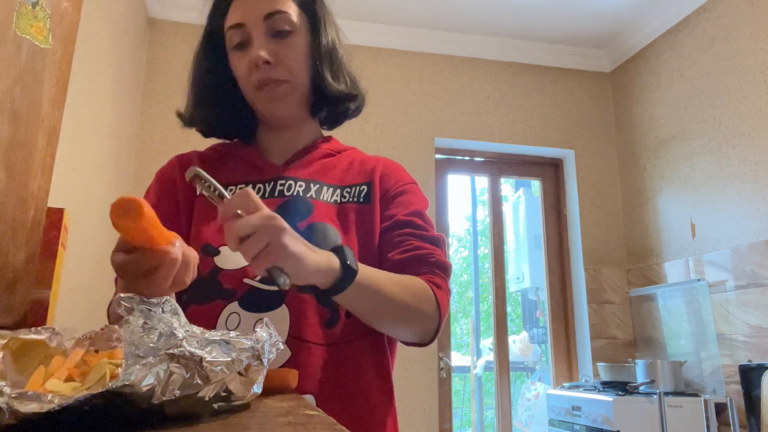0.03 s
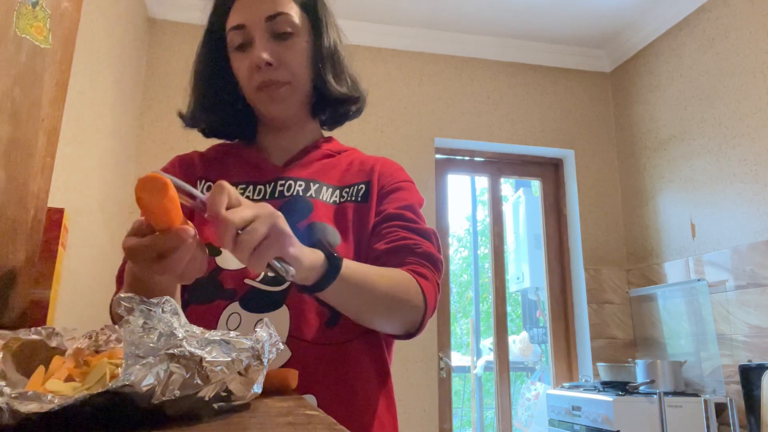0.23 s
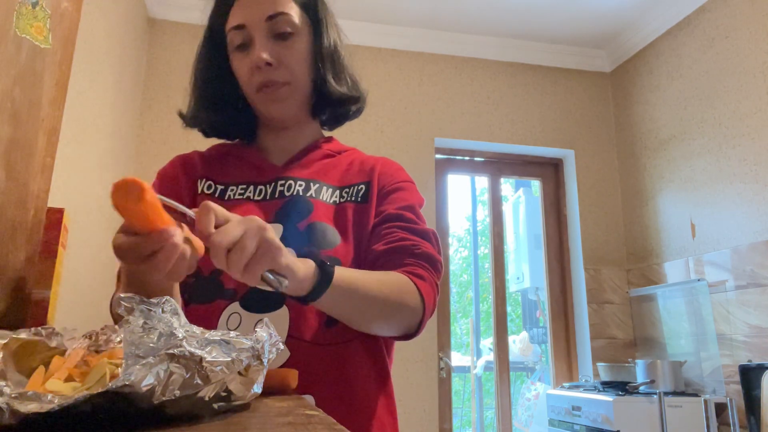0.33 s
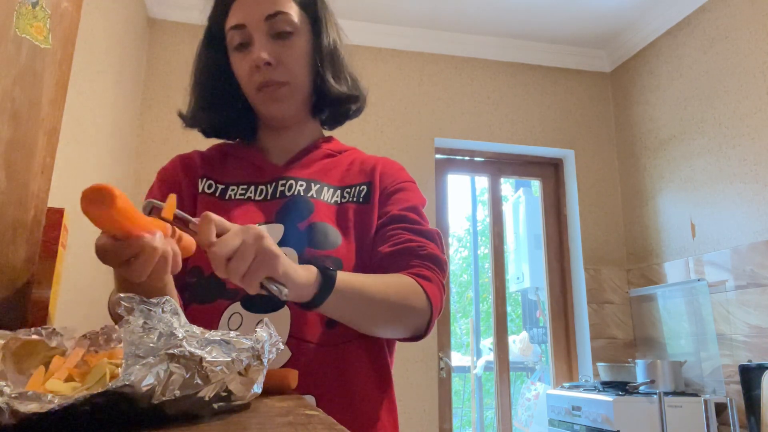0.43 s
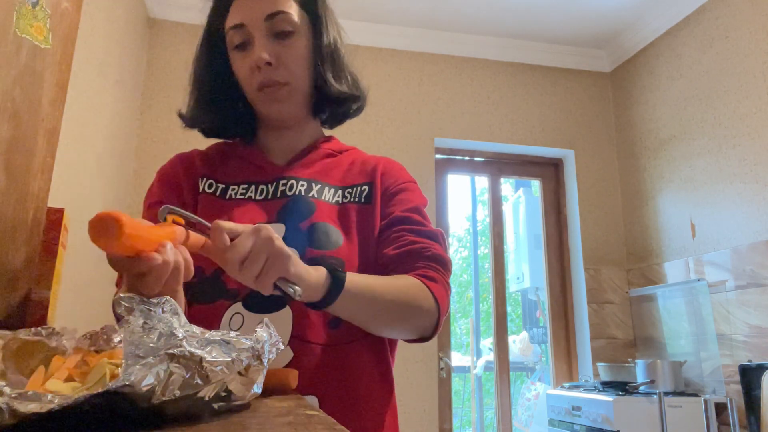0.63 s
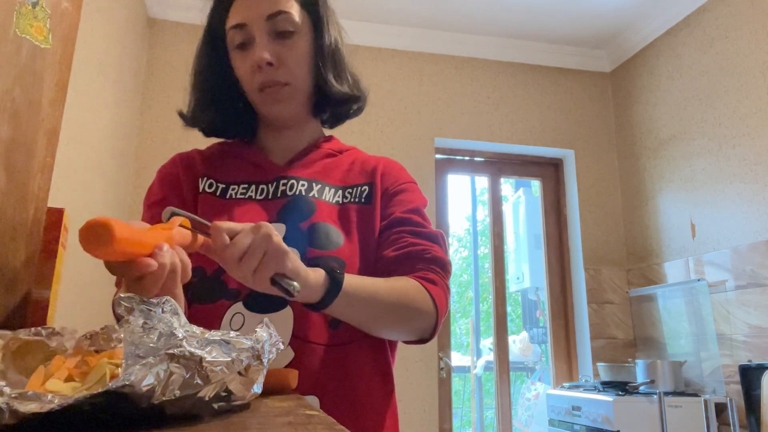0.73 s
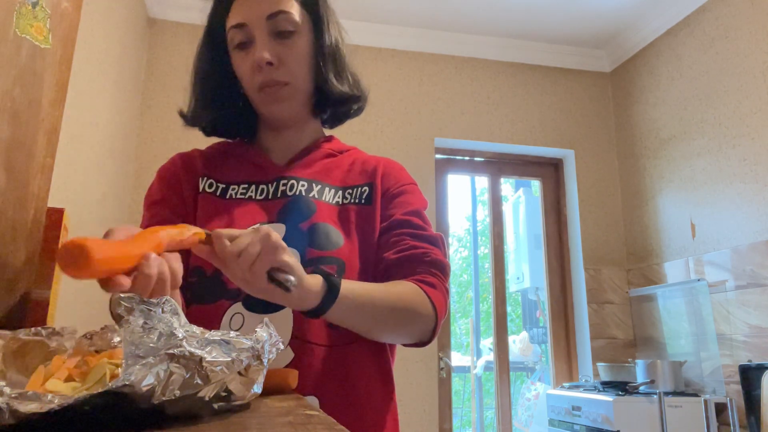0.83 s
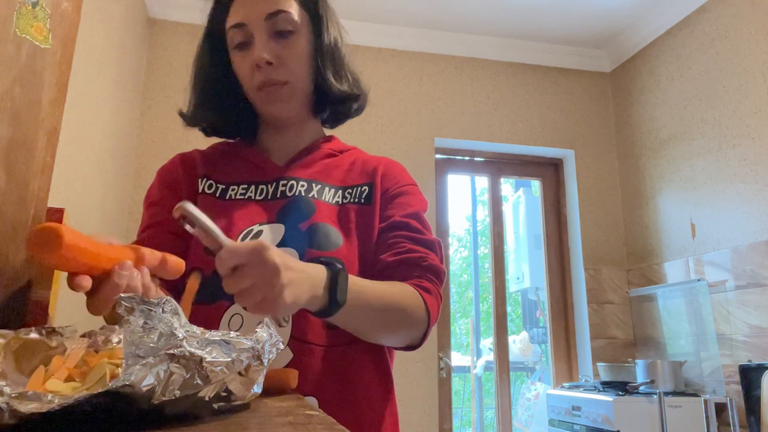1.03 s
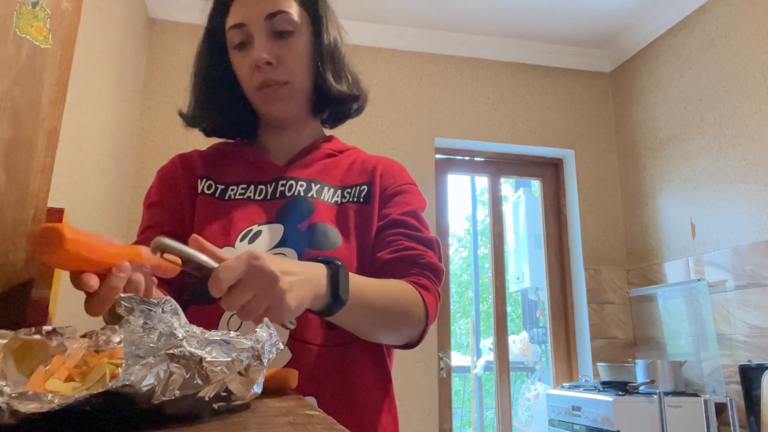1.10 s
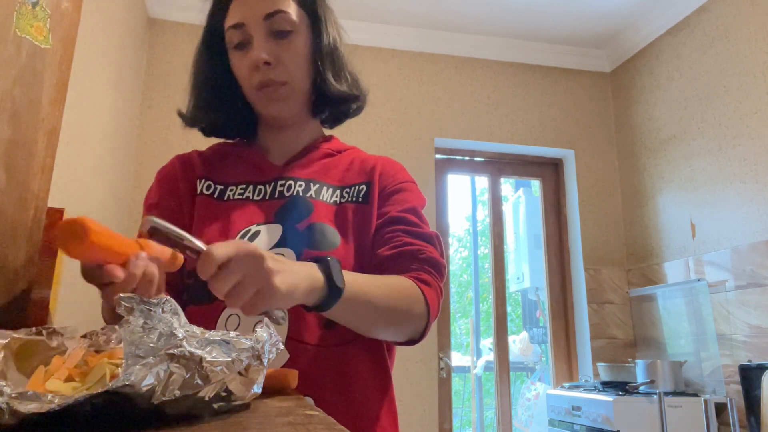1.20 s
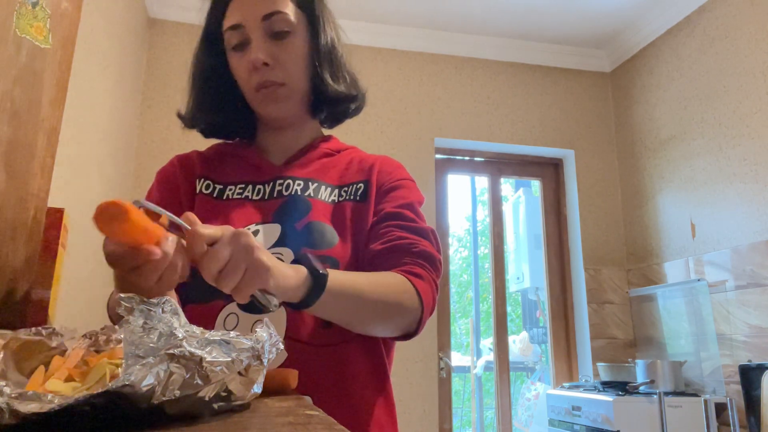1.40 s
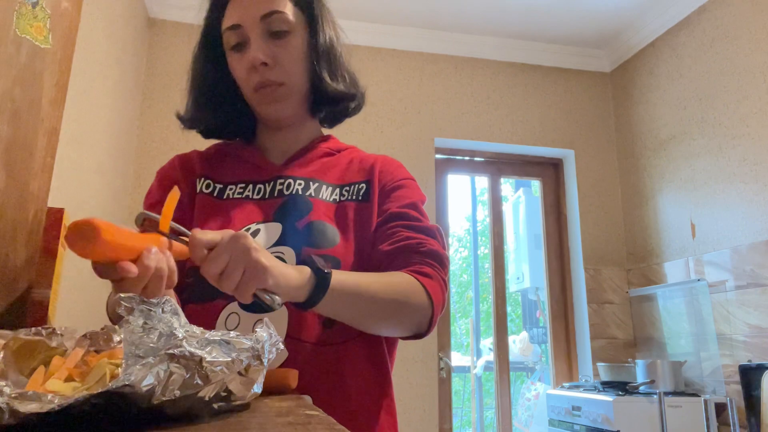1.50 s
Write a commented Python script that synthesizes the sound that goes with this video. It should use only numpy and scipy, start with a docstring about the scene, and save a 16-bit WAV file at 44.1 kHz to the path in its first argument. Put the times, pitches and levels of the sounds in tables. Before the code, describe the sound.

A hand peeler scrapes crisp strips off a raw carrot in short strokes, blade clinking lightly

```python
"""In a small, hard-walled kitchen, a swivel peeler takes strips off a raw carrot.
The loose blade chinks in its holder as ringing steel modes, then bites with a short push on the holder.
Each stroke is a dense crackle of random cell bursts, with the blade's ring, a fizz and noise-burst snaps.
A strip drops with hollow thuds of decaying modes on a foil-lined tray; filtered noise hums quietly."""
import sys
import numpy as np
from scipy import signal
from scipy.fft import rfft, irfft
from scipy.io import wavfile
from scipy.ndimage import uniform_filter1d

SR = 44100
rng = np.random.default_rng(int(sys.argv[2]) if len(sys.argv) > 2 else 0)


def persist_wave(psi):
    """Save psi, clipped to +-1, as 16-bit WAV."""
    counts = np.round(np.clip(psi, -1, 1) * 32767).astype(np.int16)
    wavfile.write(sys.argv[1], SR, np.atleast_2d(counts).T)


N = 68355
T = np.arange(N) / SR
PEELER_LAG_S = 20 / SR
TRAY_PAN_DB = 3.5  # left over right


def undb(db):
    """Decibels to gain."""
    return 10 ** (np.asarray(db) / 20)


def unit(x):
    """Scale to rms 1."""
    return x / np.sqrt(np.mean(x ** 2))


def noise():
    """White noise."""
    return rng.standard_normal(N)


def colour(x, points):
    """Minimum-phase filter through (Hz, dB) points, its impulse response scaled to unit energy."""
    hz, db = np.array(points).T
    log_bins = np.log(np.fft.rfftfreq(4096, 1 / SR) + 1)
    log_gain = np.log(undb(np.interp(log_bins, np.log(hz), db)))
    # folding the cepstrum forward in time makes the filter causal
    cepstrum = irfft(log_gain)
    half = len(cepstrum) // 2
    folded = np.r_[cepstrum[0], 2 * cepstrum[1:half], np.zeros(half)]
    impulse = irfft(np.exp(rfft(folded)))
    return signal.fftconvolve(x, impulse / np.linalg.norm(impulse))[:N]


def band(x, hz, width_hz):
    """One resonance."""
    return signal.lfilter(*signal.iirpeak(hz, hz / width_hz, fs=SR), x)


def fall(start, decay):
    """Exponential decay from a moment on, both in seconds."""
    return (T >= start) * np.exp(-np.maximum(T - start, 0) / decay)


def ring(modes, start, push, jitter=0.):
    """Decaying modes, eased in over a push of some length; jitter detunes each by a random ratio."""
    t = np.maximum(T - start, 0)
    rise = np.sin(np.pi / 2 * np.minimum(t / push, 1)) ** 2
    total = 0
    for hz, db, t60 in modes:
        detune = 1 + jitter * rng.standard_normal()
        total = total + undb(db - 60 * t / t60) * np.sin(2 * np.pi * hz * detune * t)
    return rise * total


def place(x, lag, pan_db):
    """Stereo position: the left channel comes later by the lag, and louder than the right by pan_db."""
    left = np.interp(T - lag, T, x, left=0)
    return np.array([left * undb(pan_db / 2), x * undb(-pan_db / 2)])


def cell_bursts(rate, judder):
    """Clicks of random sign and strength at random moments, so many a second: cells bursting one by one."""
    spread_db = 5
    hits = rng.random(N) < rate / SR
    return judder * hits * np.sign(noise()) * undb(spread_db * noise())


def cutting():
    """Cells burst under the blade: a broad crackle, a low crunch, the scraped blade's ring and a wet fizz."""
    # Each row: start and end in seconds, flesh in dB, blade ring in dB, ring pitch in Hz,
    # fizz in dB, low crunch in dB.
    strokes = [(0.277, 0.34, -53.5, -57.5, 4280, -60, -72), (0.337, 0.418, -51, -51.5, 4340, -53, -68.5),
               (0.424, 0.491, -49, -56, 4340, -58.5, -61.5), (0.626, 0.687, -49, -59, 4380, -51, -57.5),
               (0.733, 0.758, -45.5, -51.5, 4100, -45.5, -49.5),
               (0.766, 0.78, -49.5, -62, 4120, -38.5, -67), (1.009, 1.05, -61, -80, 4340, -82, -79.5),
               (1.059, 1.092, -56.5, -65, 4370, -76, -57.5), (1.293, 1.317, -46.5, -51, 4190, -49, -58.5),
               (1.355, 1.421, -52.5, -56.5, 4120, -55, -57), (1.416, 1.451, -50.5, -56.5, 4200, -49, -55.5),
               (1.454, 1.56, -48.5, -57, 4430, -54.5, -57)]
    # Colour of the bursting flesh. Each row: frequency in Hz, level in dB per Hz.
    flesh_colour = [(100, -18), (350, 6.5), (1000, -20), (1650, -10), (2300, 6.5), (2850, -4), (3400, 5.5),
                    (5400, -2), (6900, -0.5), (7900, 1), (9600, 1.5), (10800, 5), (12000, -26), (16000, 4)]
    # Colour of the low crunch. Each row: frequency in Hz, level in dB per Hz.
    crunch_colour = [(150, -21.5), (400, -4), (700, 3), (1000, 5), (1450, -3), (1750, -6), (2700, -16),
                     (3200, 2.5), (3700, -9.5), (6000, -15.5), (16000, -47.5)]
    cells_per_s, crunches_per_s = 7000, 1500
    judder_hz, judder_db = 260, 0.5
    fizz_hz, fizz_width_hz, scrape_width_hz = 15100, 1300, 680
    attack_s, release_s = .004, .005

    # slow random unevenness of the blade's grip
    wobble = unit(uniform_filter1d(noise(), max(int(SR / judder_hz), 1)))
    judder = undb(judder_db * wobble)

    def resonant_crackle(hz, width_hz):
        """Cell bursts through the same resonance twice, for steeper sides."""
        once = band(cell_bursts(cells_per_s, judder), hz, width_hz)
        return unit(band(once, hz, width_hz))

    flesh = unit(colour(cell_bursts(cells_per_s, judder), flesh_colour))
    crunch = unit(colour(cell_bursts(crunches_per_s, judder), crunch_colour))
    fizz = resonant_crackle(fizz_hz, fizz_width_hz)
    out = 0
    for start, end, flesh_db, ring_db, ring_hz, fizz_db, crunch_db in strokes:
        attack = 1 - np.exp(-np.maximum(T - start, 0) / attack_s)
        release = np.exp(-np.maximum(T - end, 0) / release_s)
        steel = resonant_crackle(ring_hz, scrape_width_hz)
        crackle = undb(flesh_db) * flesh + undb(crunch_db) * crunch
        out = out + attack * release * (crackle + undb(ring_db) * steel + undb(fizz_db) * fizz)
    return out


def snaps():
    """Tough fibres give way: a bright noise burst with a lower crack."""
    # Each row: start in seconds, level in dB, decay in seconds, low crack in dB relative to the burst.
    fibres = [(0.2651, -21.5, 0.0025, -21.5), (0.2773, -43, 0.0025, -11), (0.287, -39, .003, -38),
              (0.633, -44.5, 0.01, -5), (.773, -40.5, 0.00084, -25), (0.777, -55, 0.0016, -36.5),
              (0.9539, -45.5, .003, -6.5), (1.027, -47, 0.0035, 2), (1.085, -44.5, 0.0015, -5),
              (1.3125, -29.5, 0.001, -16), (1.381, -45.5, 0.0042, -2), (1.4296, -46.5, 0.0012, 8),
              (1.438, -49, 0.0027, -5)]
    # Colour of the bright burst. Each row: frequency in Hz, level in dB per Hz.
    snap_colour = [(1000, -7.5), (4000, -27), (7000, -4.5), (9000, 1), (10600, 9.5), (12300, -35),
                   (13600, 5.5), (15300, -2.5), (17000, 2)]
    crack_hz, crack_width_hz = 1677, 4500
    bright = colour(noise(), snap_colour)
    crack = unit(band(noise(), crack_hz, crack_width_hz))
    out = 0
    for start, db, decay, crack_db in fibres:
        out = out + undb(db) * fall(start, decay) * (bright + undb(crack_db) * crack)
    return out


def bite():
    """The blade bites in once: a short push sets the holder ringing."""
    # Modes of the holder. Each row: frequency in Hz, level in dB, 60 dB decay in seconds.
    holder = [(4220, 1.5, 0.016), (4370, -23, 0.0058), (3085, -18.5, 0.016), (2015, -32, 0.036)]
    start_s, push_s, level_db = .2664, 0.0012, -9.5
    return undb(level_db) * ring(holder, start_s, push_s)


def chinks():
    """The swivelling blade knocks against its stops: steel modes ring and noise chatters briefly."""
    # Knocks of the loose blade. Each row: start in seconds, level in dB, chatter in dB relative to it.
    knocks = [(0.0468, -66, -11), (0.0656, -42.5, -9.5), (0.1234, -40.5, -19), (0.135, -33, -12.5),
              (0.1562, -24, -26), (.164, -28, -14.5), (0.9862, -59.5, 8), (1.0062, -54, 8.5),
              (1.08, -74, 4), (1.2132, -51.5, -3), (1.295, -45.5, -4.5), (1.3095, -34.5, -19)]
    # Modes of the blade. Each row: frequency in Hz, level in dB, 60 dB decay in seconds.
    blade = [(4184, -6, 0.032), (4416, -17.5, .035), (5600, -16, .04), (7200, -43, 0.042), (9360, -28, .03),
             (13200, -35, 0.23), (15300, -31, .03)]
    # Colour of the chatter. Each row: frequency in Hz, level in dB per Hz.
    chatter_colour = [(1000, -15), (3500, -18), (4250, -12.5), (5000, -12.5), (6300, -24.5), (7300, -1),
                      (8200, -16.5), (9400, -8), (10300, -4.5), (10950, 1), (11900, -20.5), (14200, -12),
                      (15400, -9.5), (17000, -24)]
    edge = (10953, -5.5, .055)  # the thin edge, strongest mode: Hz, dB, 60 dB decay in seconds
    push_s, chatter_s = 0.0014, 0.0093
    chatter = colour(noise(), chatter_colour)
    out = 0
    for start, db, chatter_db in knocks:
        steel = ring([*blade, edge], start, push_s, jitter=0.0023)
        rattle = undb(chatter_db) * chatter * fall(start, chatter_s)
        out = out + undb(db) * (steel + rattle)
    return out


def tray():
    """The strip flops down: hollow modes, mostly sinking as it settles, and a dull rustle of foil."""
    # Landing and settling. Each row: start in seconds, level in dB, pitch ratio.
    thuds = [(1.082, -41.5, 1.1), (1.095, -37.5, 1.08), (1.114, -33, 1.0), (1.16, -41, 0.9),
             (1.197, -42.5, .91), (1.227, -52.5, .91), (1.262, -56, 0.85)]
    # Modes of the tray at ratio 1. Each row: frequency in Hz, level in dB, 60 dB decay in seconds.
    tray_modes = [(109.3, -9.5, 0.21), (151.4, -19, 0.43), (324, 3, .17), (365.6, -10, 0.15),
                  (464, -18, 0.15), (891, -17, 0.2), (1119, -17, 0.097), (1470, -32.5, 0.18)]
    push_s, foil_db, foil_s = 0.0078, -24, 0.01
    foil = undb(foil_db) * unit(band(noise(), 930, 670))
    out = 0
    for start, db, ratio in thuds:
        modes = [(hz * ratio, mode_db, t60) for hz, mode_db, t60 in tray_modes]
        hollow = ring(modes, start, push_s)
        out = out + undb(db) * (hollow + foil * fall(start, foil_s))
    return out


def rubs():
    """Fingers slip a little on the wet carrot between strokes: soft fading bands of noise."""
    # Each row: start in seconds, level in dB, centre in Hz.
    slips = [(.585, -62.5, 1490), (0.972, -71, 820)]
    decay_s, width_hz = 0.07, 460
    out = 0
    for start, db, hz in slips:
        out = out + undb(db) * fall(start, decay_s) * unit(band(noise(), hz, width_hz))
    return out


def nearby(x):
    """Quick scattered echoes from the cupboard and worktop: a short noise burst for each ear."""
    # Colour of the echoes. Each row: frequency in Hz, level in dB.
    echo_colour = [(200, -10.5), (1000, 5), (3200, -6), (5000, 3), (7000, 6), (9000, -7.5), (16000, -36.5)]
    level_db, delay_s, decay_s = -6.5, 0.0019, 0.003
    out = []
    for _ in range(2):
        burst = colour(noise() * fall(delay_s, decay_s), echo_colour)
        out.append(signal.fftconvolve(x, burst / np.linalg.norm(burst))[:N])
    return undb(level_db) * np.array(out)


def kitchen(x):
    """Diffuse ring of the walls: noise tails, shorter in the treble, unrelated left and right."""
    # Colour of the room. Each row: frequency in Hz, level in dB.
    room_colour = [(100, -9.5), (330, -1), (560, 1.5), (800, 0.5), (1200, 5), (2400, 4.5), (4200, 0.5),
                   (7000, 3), (11000, 2.5), (15500, -9)]
    t60_s, treble_t60_s, delay_s = 0.48, 0.25, 0.0034
    lowpass = signal.butter(1, 3000, fs=SR, output="sos")
    out = []
    for _ in range(2):
        full = noise()
        low = signal.sosfilt(lowpass, full)
        treble = full - low
        # 60 dB is a factor of 1000
        tail = low * fall(delay_s, t60_s / np.log(1000))
        tail = tail + treble * fall(delay_s, treble_t60_s / np.log(1000))
        response = colour(tail / np.linalg.norm(tail), room_colour)
        out.append(signal.fftconvolve(x, response)[:N])
    return np.array(out)


def rumble():
    """A deep, narrow band of noise that is loudest just after the strip lands."""
    # Level curve. Each row: time in seconds, level in dB.
    sway = [(0, -68), (.6, -72.5), (.95, -65.5), (1.15, -65), (1.3, -59.5), (1.55, -70.5)]
    hz, width_hz = 55.8, 28
    deep = unit(band(band(noise(), hz, width_hz), hz, width_hz))
    return place(undb(np.interp(T, *np.array(sway).T)) * deep, 0, TRAY_PAN_DB)


def half_shared(make):
    """Stereo noise: one part common to both sides, one part separate."""
    common = make()
    separate = np.array([make(), make()])
    return (common + 0.61 * separate) / np.hypot(1, .6)


def background():
    """Coloured noise for the room hum, a soft band for handling and a dying wash of earlier sound."""
    # Colour of the room hum. Each row: frequency in Hz, level in dB per Hz.
    air_colour = [(18, -29.5), (32, -17.5), (48, 3.5), (100, -0.5), (200, -18), (400, -9), (800, -27),
                  (1600, -26), (4000, -32.5), (9000, -33.5), (16000, -47)]
    # Level curve of the handling rumble. Each row: time in seconds, level in dB.
    handling = [(0, -52), (.08, -57.5), (.22, -64.5), (.33, -56.5), (.42, -61), (.5, -60), (.6, -69.5),
                (.95, -72.5), (1.12, -65), (1.33, -64.5), (1.55, -74)]
    air_db, hand_hz, hand_width_hz = -65.5, 143.7, 130
    earlier_db, earlier_t60_s = -59.5, 1
    air = undb(air_db) * half_shared(lambda: colour(noise(), air_colour))
    hand_gain = undb(np.interp(T, *np.array(handling).T))
    hands = hand_gain * half_shared(lambda: unit(band(noise(), hand_hz, hand_width_hz)))
    fading = undb(earlier_db) * fall(0, earlier_t60_s / np.log(1000))
    wash = fading * np.array([unit(band(noise(), 1100, 2000)) for _ in range(2)])
    balance = undb(np.array([[1], [-1]]) * TRAY_PAN_DB / 2)
    return (air + hands) * balance + wash


def scene():
    """Peeler and tray close by, with the kitchen around them."""
    cut, bitten, blade, thud = cutting() + snaps(), bite(), chinks(), tray()
    direct = place(cut + blade, PEELER_LAG_S, 0)
    direct = direct + place(bitten, PEELER_LAG_S, -4)
    direct = direct + place(thud, 0.00027, TRAY_PAN_DB)
    # each source excites the walls by its own amount
    to_walls = undb(-6) * cut + undb(-15.5) * bitten + undb(-10.5) * blade + undb(-4) * thud
    return direct + nearby(cut) + kitchen(to_walls) + background() + rumble() + rubs()


def record(dry):
    """A high-pass trims the deepest rumble and a steep low-pass cuts the top."""
    rumble_cut_hz, top_hz = 12, 15750
    dry = signal.sosfilt(signal.butter(4, rumble_cut_hz, "high", fs=SR, output="sos"), dry)
    return signal.sosfilt(signal.ellip(10, .2, 70, top_hz, fs=SR, output="sos"), dry)


dry = scene()
out = record(dry)
persist_wave(out)
```